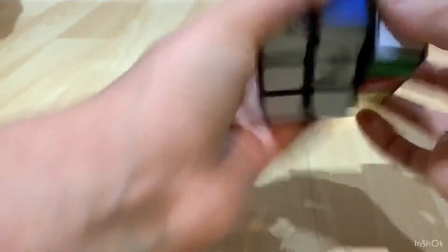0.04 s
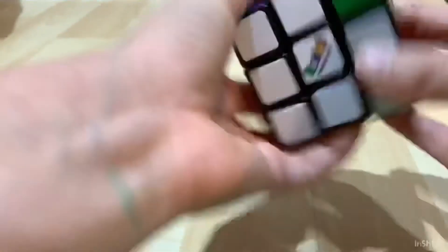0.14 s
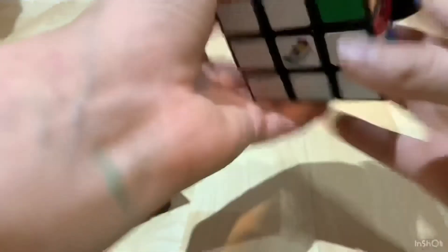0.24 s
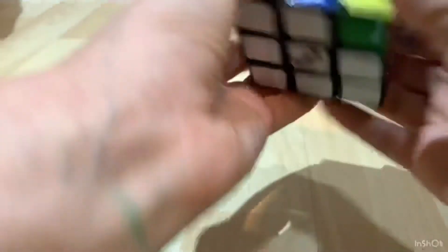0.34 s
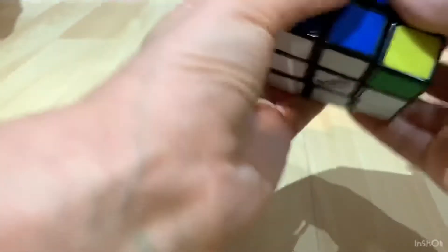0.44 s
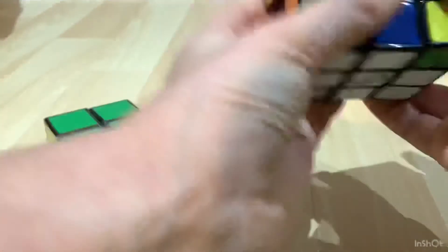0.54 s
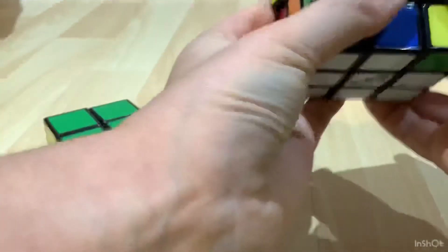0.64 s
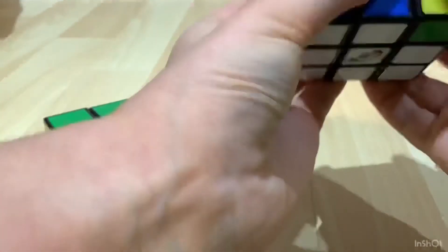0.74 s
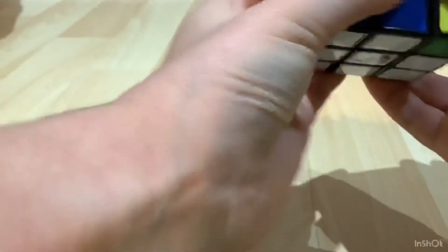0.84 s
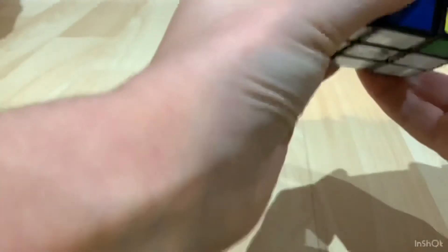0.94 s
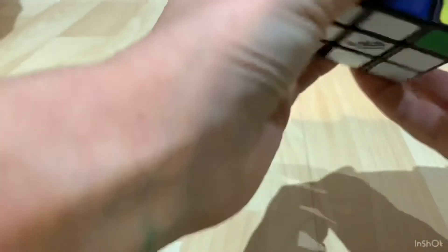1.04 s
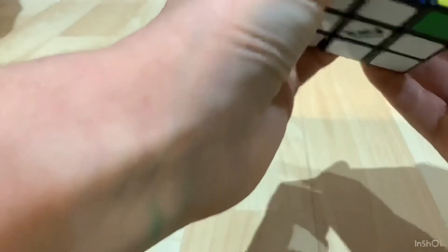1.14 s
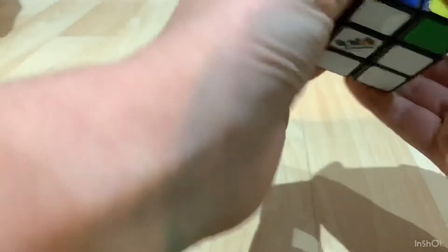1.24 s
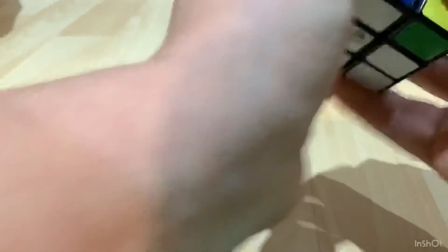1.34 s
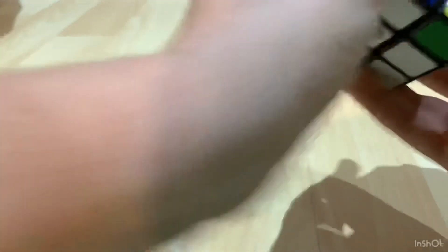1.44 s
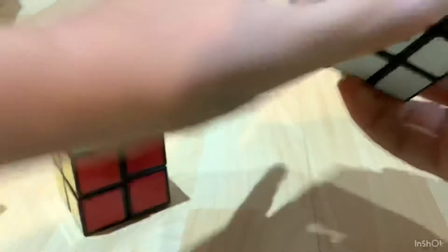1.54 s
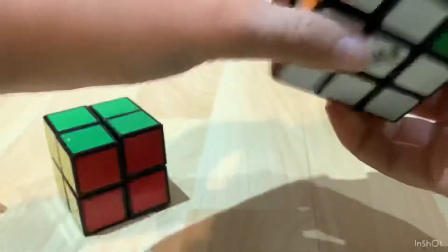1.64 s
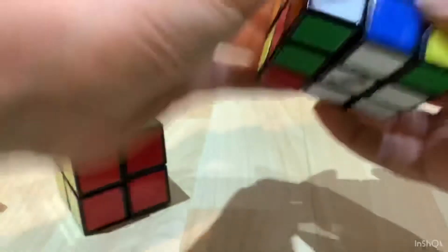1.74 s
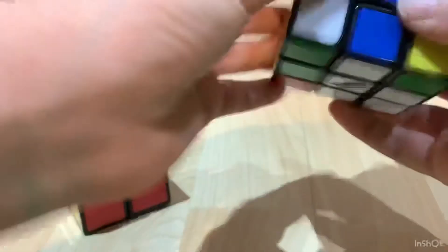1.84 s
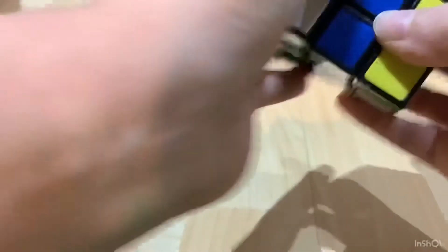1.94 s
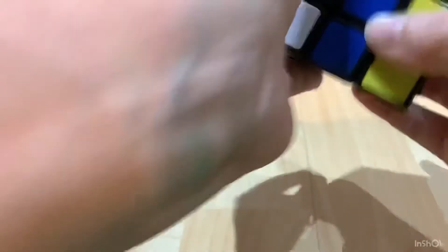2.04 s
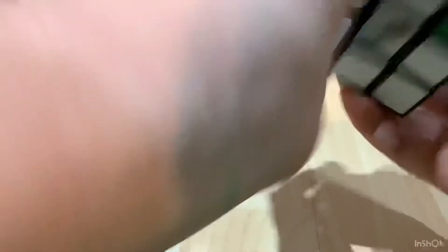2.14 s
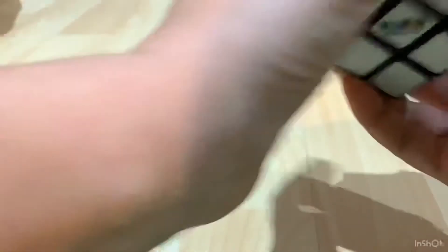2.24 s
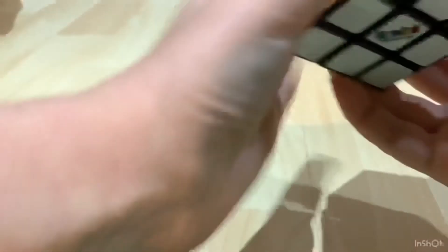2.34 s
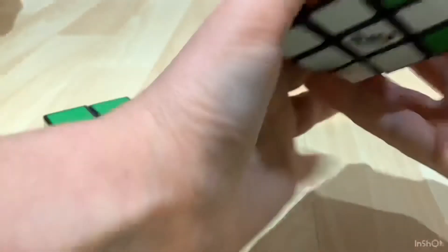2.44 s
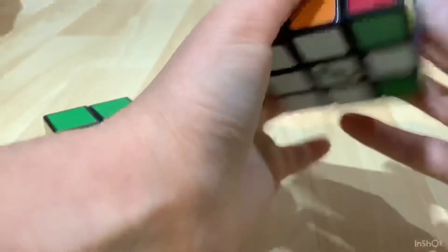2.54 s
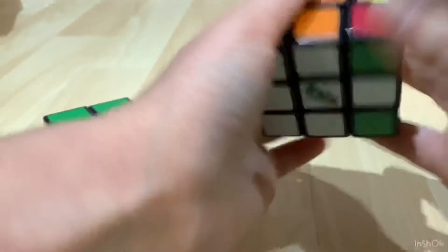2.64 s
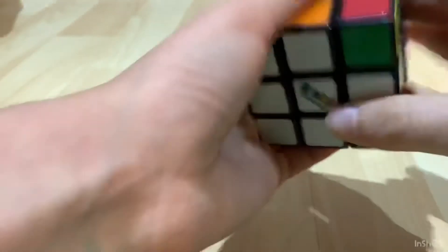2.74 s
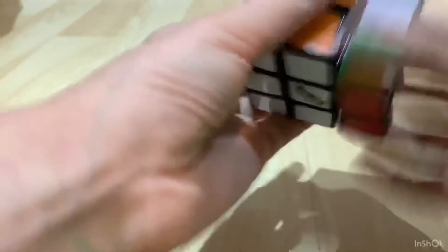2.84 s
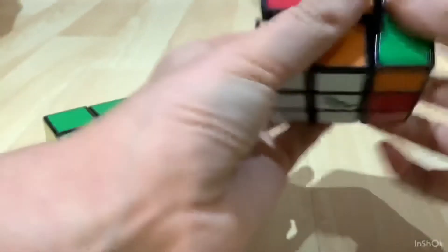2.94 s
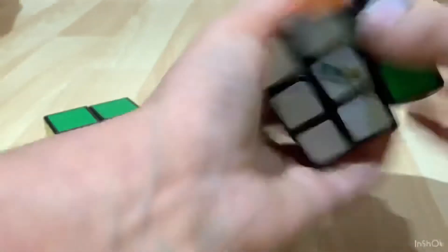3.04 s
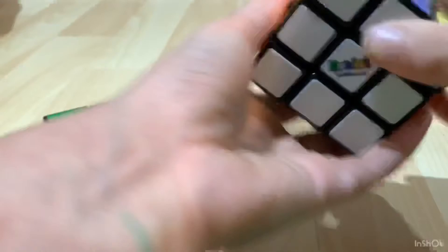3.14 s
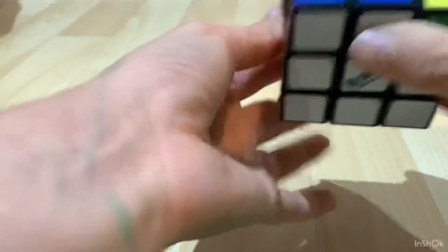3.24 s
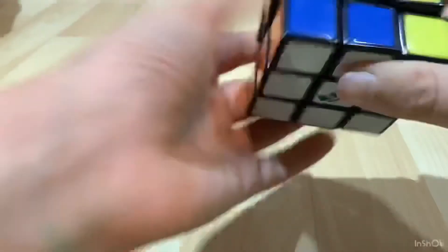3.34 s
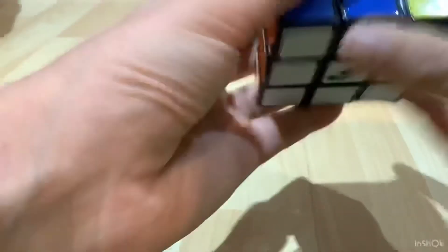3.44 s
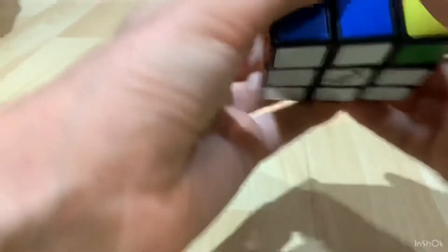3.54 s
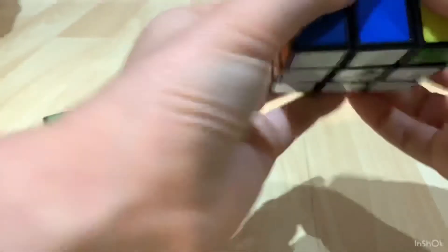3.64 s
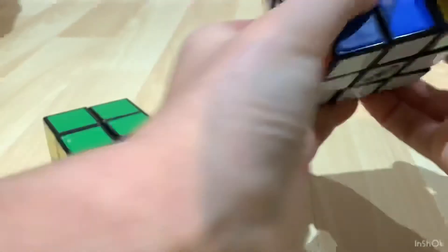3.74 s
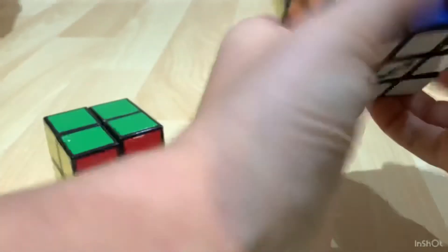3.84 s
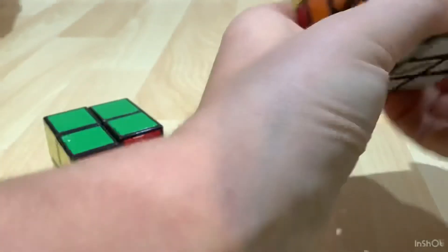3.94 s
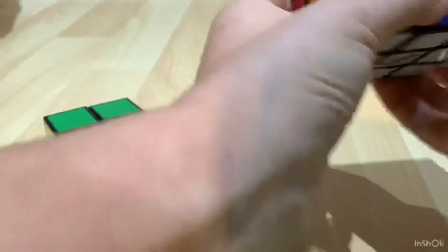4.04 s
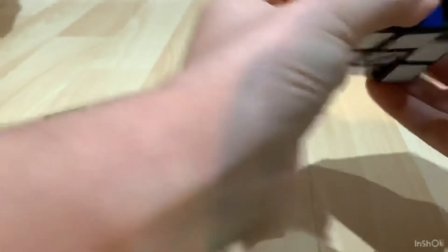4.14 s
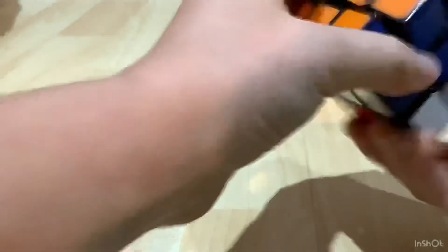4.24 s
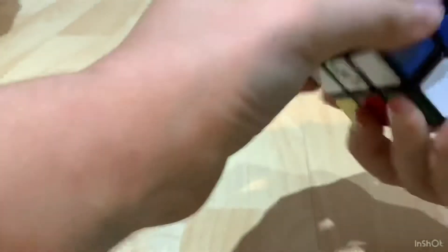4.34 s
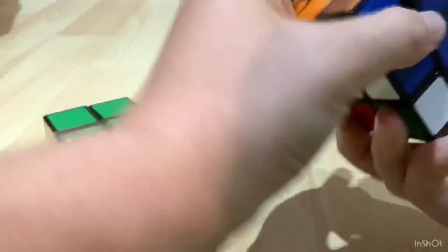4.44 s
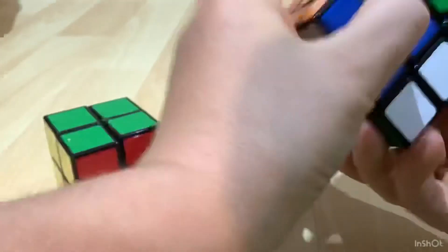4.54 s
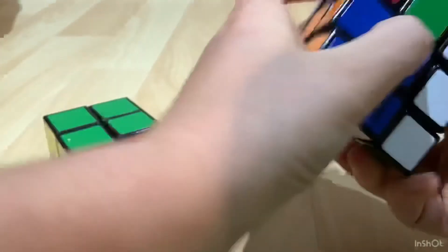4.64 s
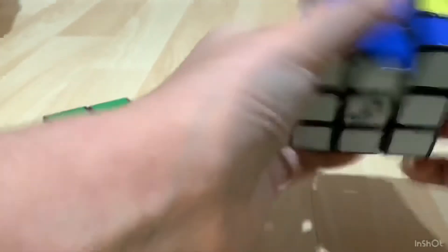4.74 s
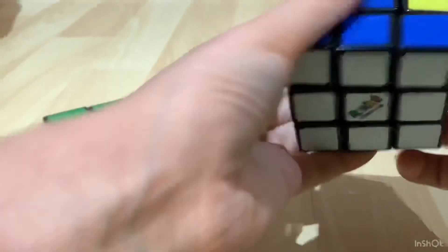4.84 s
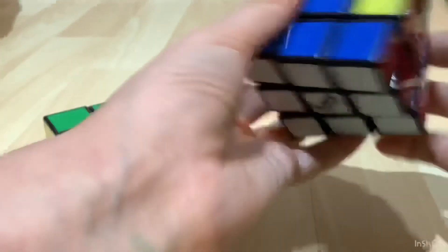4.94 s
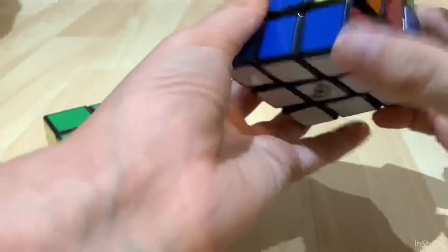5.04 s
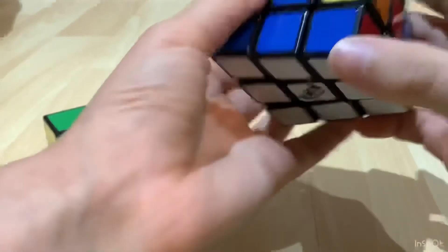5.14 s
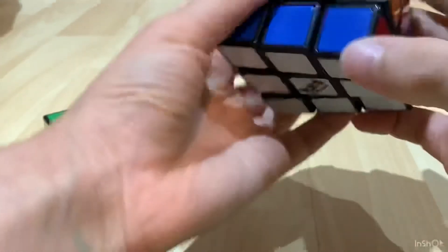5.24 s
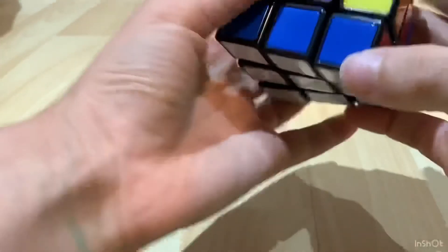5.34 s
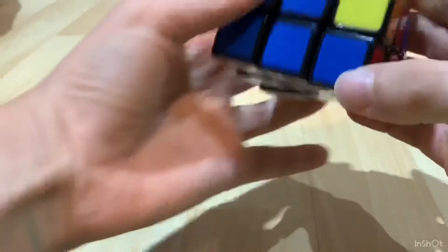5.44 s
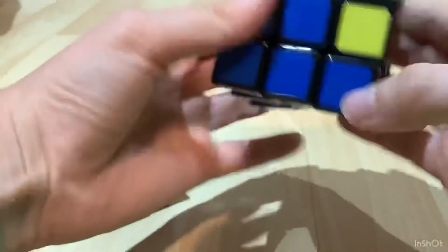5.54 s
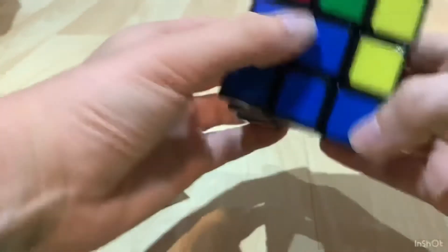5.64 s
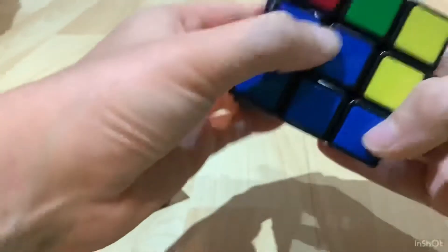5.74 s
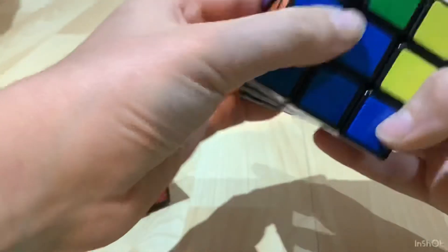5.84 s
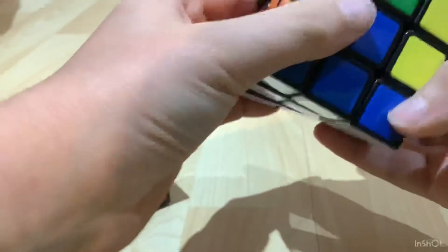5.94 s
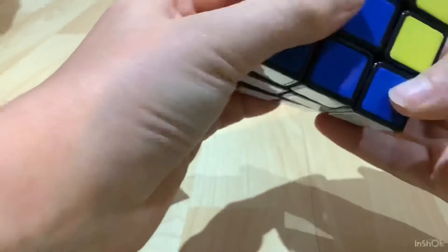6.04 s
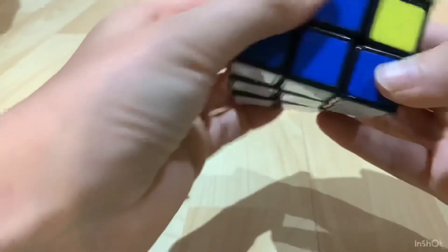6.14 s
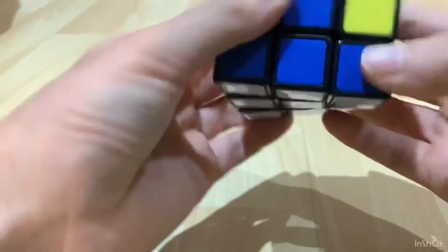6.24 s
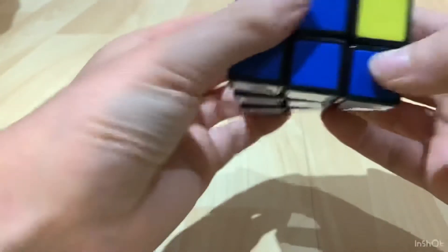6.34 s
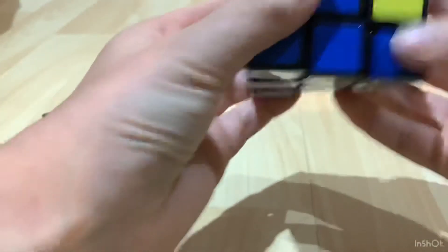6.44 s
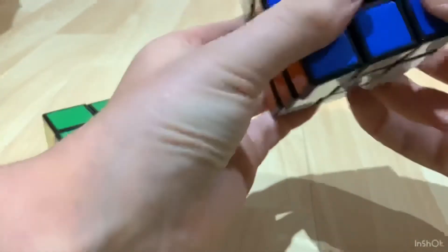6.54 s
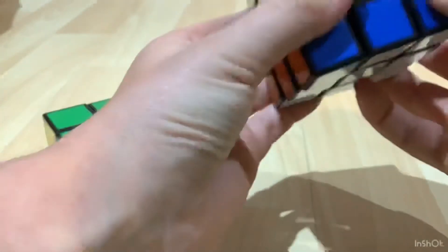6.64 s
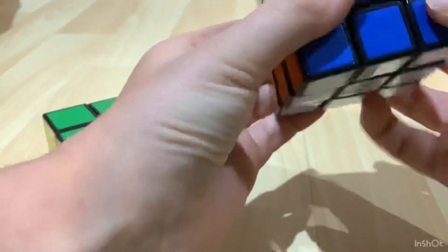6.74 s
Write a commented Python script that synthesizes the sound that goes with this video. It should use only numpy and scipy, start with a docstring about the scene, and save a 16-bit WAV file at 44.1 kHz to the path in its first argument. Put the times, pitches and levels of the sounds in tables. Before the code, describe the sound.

A plastic puzzle cube is turned fast by hand, very close to the microphone in a quiet small room. Bright hollow clacks come in irregular clusters with short gritty scrapes of sliding faces, tiny loose ticks and a light hiss of fingers. Turns grow denser and louder through the middle, then fade to faint handling ticks before a last hard burst of clacks. Soft air noise and low hum lie beneath.

```python
"""Rapid plastic clacks open the scene over quiet air and low hum: a puzzle cube twisted by hand in a quiet room.
Each clack is a short chatter of impacts ringing the shell's modes; weaker ticks of loose pieces fall among them.
Faces grind past each other as clumped slips that ring the same shell, swelling with every move.
Fingers hiss over the glossy tiles and scuff in narrower bands, both made from random tiny impacts.
The room adds a diffuse noise echo, and the loudest peaks are softly rounded."""
import sys
import numpy as np
from scipy import signal
from scipy.fft import rfft, irfft, next_fast_len
from scipy.io import wavfile
from scipy.ndimage import uniform_filter1d

SR = 44100
rng = np.random.default_rng(int(sys.argv[2]) if len(sys.argv) > 2 else 0)


def store_wav(level_fs):
    """Save 16-bit WAV to argv[1]."""
    pcm = np.round(np.clip(np.atleast_2d(level_fs), -1, 1) * 32767)
    wavfile.write(sys.argv[1], SR, pcm.T.astype(np.int16))


N = 299439

# resonances of the cube's shell, before the loss of bass: pitch_hz, width_hz, level_db (relative)
SHELL_MODES = [(208, 146, 12.5), (741, 383, 7), (1307, 548, 11), (2070, 370, 5), (3020, 290, 10),
               (3505, 340, 8.5), (4597, 830, 3.5), (5130, 550, 6.5), (5880, 1400, 2), (8890, 1830, 0.5),
               (9824, 1400, 2.5), (11400, 6500, -12)]


def amp(db):
    """Decibels to gain."""
    return 10 ** (np.asarray(db) / 20)


def evened(x):
    """Scales to rms 1."""
    return x / np.sqrt(np.mean(x ** 2) + 1e-20)


def read(points, hz):
    """Reads a curve of (frequency, value) points on a log-frequency axis."""
    f, value = np.transpose(points)
    return np.interp(np.log(hz + 1), np.log(f + 1), value)


def coloured(x, gain_of_hz):
    """Multiplies the spectrum of x by a response."""
    size = next_fast_len(len(x))
    hz = np.fft.rfftfreq(size, 1 / SR)
    return irfft(rfft(x, size) * gain_of_hz(hz), size)[:len(x)]


def room_tone():
    """Steady air noise and a few narrow, wavering bands of hum, all filtered from white noise."""
    # colour of the air noise: pitch_hz, level_db (relative)
    air_colour = [(30, -46), (45, -9), (110, -9.5), (400, -23.5), (700, -19.5), (1400, -42), (5000, -35.5),
                  (9000, -33), (11500, -41.5), (16000, -43)]
    # hum bands: pitch_hz, width_hz (between half-amplitude points), level_db (rms)
    hum_bands = [(66, 8.6, -65.5), (88.6, 3, -57.5), (236.4, 35, -66.5), (294.2, 30, -70)]
    air_db = -59
    out = amp(air_db) * evened(coloured(rng.standard_normal(N), lambda hz: amp(read(air_colour, hz))))
    for f, width_hz, db in hum_bands:
        band = coloured(rng.standard_normal(N), lambda hz: 1 / (1 + (2 * (hz - f) / width_hz) ** 2))
        out += amp(db) * evened(band)
    return out


def modes(hz):
    """Response of each shell mode, one row a mode; so small an object radiates little bass."""
    radiated = 1 / (1 + (600 / (hz + 1)) ** 4)
    rows = []
    for k, (f, width_hz, db) in enumerate(SHELL_MODES):
        # signs go in pairs for the first four modes, then alternate
        sign = (-1) ** (max(k, 1) + (k > 2))
        damping = 1j * hz * width_hz
        rows.append(sign * amp(db) * radiated * damping / (f ** 2 - hz ** 2 + damping))
    return np.array(rows)


def grit(per_s=8000, spread_db=2.4):
    """Tiny random impacts, most of them small, a few large."""
    size = amp(spread_db * np.minimum(rng.exponential(1, N), 5))
    sign = rng.choice([-1., 1.], N)
    return size * sign * (rng.random(N) < per_s / SR)


def clumps(depth_db, size):
    """Uneven contact: a gain that flickers by chance over size samples, its highest leaps capped."""
    flicker = evened(uniform_filter1d(rng.standard_normal(N), size=size))
    return amp(depth_db * np.minimum(flicker, 2))


def motion(column):
    """Gain curve of one column of the moves: swells fall evenly in dB from each peak and add up."""
    # turns and regrips: peak_s, grinding_db, fingers_db, lead_in_s, run_out_s
    moves = np.array([(0, -31.5, -35.5, .05, 0.097), (.15, -42, -49, 0.15, 0.27),
                      (0.464, -30, -54, 0.06, 0.043), (.56, -55, -53, 0.15, 0.21),
                      (0.902, -61, -44, 0.022, 0.075), (1.12, -65, -62, 0.3, 0.021),
                      (1.253, -39.5, -55, 0.091, 0.087), (1.654, -29.5, -35.5, 0.06, 0.043),
                      (1.806, -33.5, -60, 0.062, 0.063), (2.069, -29.5, -43, 0.037, 0.092),
                      (2.253, -50, -50, 1, 0.31), (2.462, -55.5, -47, 0.11, 0.21),
                      (2.791, -29, -32, 0.064, 0.014), (2.973, -33.5, -40, 0.15, 0.24),
                      (3.163, -29.5, -34.5, 0.052, 0.023), (3.314, -52.5, -39.5, 0.052, 0.11),
                      (3.562, -47, -50, 0.16, 0.072), (3.624, -18.5, -28.5, 0.016, 0.031),
                      (3.839, -53.5, -100, 0.56, 0.2), (3.947, -26.5, -41, 0.028, 0.066),
                      (4.151, -31, -33.5, 0.088, 0.057), (4.33, -43, -54.5, 0.3, 0.3),
                      (4.655, -23.5, -28.5, 0.015, 0.048), (5.05, -58, -57, 1, 0.5),
                      (5.298, -53, -55.5, 0.064, 0.062), (5.508, -64, -45.5, 0.051, 0.16),
                      (6.002, -62, -57, 0.084, 1), (6.182, -47.5, -45.5, 0.041, 0.046),
                      (6.437, -34.5, -38, 0.07, 0.037), (6.55, -50.5, -89, 0.068, 0.2),
                      (6.742, -45, -83, 0.017, 0.02)])
    drop_db = 23  # fall at one lead-in before the peak or one run-out after it
    t = np.arange(0, N + 64, 64) / SR
    late = t - moves[:, :1]
    side_s = np.where(late < 0, moves[:, 3:4], moves[:, 4:5])
    far = abs(late) / np.maximum(side_s, 1e-3)
    gain = amp(moves[:, column, None] - drop_db * far).sum(0)
    return np.interp(np.arange(N) / SR, t, gain)


def grinding():
    """Faces scrape in clumped slips shared among contact points, each ringing the shell in its own colour."""
    slips = clumps(3.8, size=120) * grit(per_s=2000, spread_db=2.4)
    points = 4
    # one contact point at a time slips, drawn anew every 256 samples
    point = rng.integers(points, size=N // 256 + 1).repeat(256)[:N]
    shares = amp(3.0 * rng.standard_normal((points, len(SHELL_MODES))))
    scrape = np.zeros(N)
    for k, share in enumerate(shares):
        scrape += coloured(slips * (point == k), lambda hz: share @ modes(hz) * (1 + hz / 3000) ** -.4)
    return motion(column=1) * evened(scrape)


def fingers():
    """Skin on glossy tiles: a grainy hiss that sticks and slips."""
    # colour of skin on tiles: pitch_hz, level_db (relative)
    skin_colour = [(1500, -8), (8500, -1), (12000, -12), (16000, -32)]
    fizz = clumps(4.2, size=250) * grit()
    return motion(column=2) * evened(coloured(fizz, lambda hz: amp(read(skin_colour, hz))))


def loose_ticks():
    """Clack rows for loose pieces ticking at chance moments, their level following the grinding."""
    ticks_per_s = 24
    over_grinding_db, top_db, spread_db = 9, -34, 1.5  # the spread comes after the cap at top_db
    bright_spread_db, typical_ms = 9.5, 2.7  # brightness is per octave
    count = round(ticks_per_s * N / SR)
    # one tick at a random moment in each equal slot
    s = (np.arange(count) + rng.random(count)) / ticks_per_s * (1 - 1 / count)
    a, b, c = rng.standard_normal((count, 3)).T
    moving_db = 20 * np.log10(motion(column=1)[(s * SR).astype(int)])
    blow_db = np.minimum(moving_db + over_grinding_db, top_db) + spread_db * a
    return np.transpose([s, blow_db, bright_spread_db * b, typical_ms * np.exp(c / 2)])


def clacks():
    """Layers catch and seat: each chatter of impacts rings every shell mode by its own chance amount."""
    # clear clacks: time_s, blow_db, brightness_db_per_octave, chatter_ms (held to 0.5-7 ms below)
    clear_clacks = [(.0099, -21.5, 1, 11), (.0263, -27.5, 1, 10), (.0401, -22, 3.5, 2.9),
                    (.049, -29, 1, 2.3), (.1137, -27, 2, 2), (.121, -21.5, -1.5, 3.5),
                    (.1437, -25.5, -0.5, 10), (.1526, -25.5, 3, 2.3), (.1601, -29, -1.5, 5.8),
                    (.3154, -37.5, 3, 3.3), (.3434, -29.5, 2, 1.7), (.4055, -31, -1.5, 2),
                    (.4115, -20.5, -1.5, 2.2), (.429, -32, -0.5, 2.3), (.4437, -25, -7, 1.3),
                    (.4475, -25.5, 2, 2.2), (.4527, -17.5, -2.5, 0.91), (.4592, -32, 0, 2.3),
                    (.4718, -30, 0, 3.4), (.4878, -34, -2.5, 2.4), (.5732, -42, -2.5, 3.8),
                    (.6203, -38.5, -1.5, 3), (.8545, -47, 3.5, 4.5), (.873, -47, 0, 2.5),
                    (.8916, -36.5, 16, 2.7), (1.056, -44, 2.5, 3), (1.068, -47, 1, 2.9),
                    (1.1978, -43, 15, 4), (1.2375, -29.5, -8, 2.6), (1.2481, -24.5, -0.5, 3.3),
                    (1.2643, -21.5, -1, 1.7), (1.2943, -35, -3, 5.3), (1.3051, -34, -1, 3.2),
                    (1.3249, -25, -0.5, 12), (1.392, -28.5, -1.5, 1.7), (1.412, -41, 6, 1.2),
                    (1.5302, -35.5, 5, 3.3), (1.5546, -32, 4, 1.1), (1.5739, -34, 1, 2.1),
                    (1.6037, -24.5, -1, 4.6), (1.644, -21, 4.5, 2.1), (1.6499, -14, 2.5, 0.93),
                    (1.6546, -24, 1, 0.63), (1.6594, -24.5, -2, 4.6), (1.671, -26.5, -0.5, 5.7),
                    (1.751, -34.5, 3.5, 6), (1.775, -25.5, 0.5, 1.55), (1.7964, -17, 0, 1.7),
                    (1.8092, -26, 11, 2.9), (1.8255, -33, -2.5, 6.2), (1.854, -30.5, -3, 3.4),
                    (1.865, -32, -0.5, 9.4), (1.8827, -28.5, -4.5, 1.3), (2.0007, -26.5, 2.5, 2.1),
                    (2.0325, -25, -1, 12), (2.0505, -31, 4, 3.6), (2.0655, -20.5, -3, 5.7),
                    (2.0761, -19, 3.5, 2.8), (2.1055, -38, 7, 2.6), (2.152, -31, -2, 1.4),
                    (2.1824, -28.5, -1, 11), (2.1988, -28, 1.5, 9.1), (2.2293, -34.5, -5, 7.2),
                    (2.2436, -19, -0.5, 2.7), (2.26, -28.5, -1, 5.9), (2.3288, -31, -1.5, 8.7),
                    (2.351, -34, -6.5, 1.8), (2.358, -26.5, -2, 1.1), (2.6054, -33, 1, 2.6),
                    (2.6901, -35.5, 10, 1.3), (2.7004, -38.5, 2, 1.8), (2.7346, -18, 0.5, 2.2),
                    (2.7503, -33.5, -2.5, 12), (2.7597, -21, 1.5, 5.1), (2.7721, -13.5, -0.5, 2.7),
                    (2.7804, -20.5, 7, 2.3), (2.7925, -21, 0, 2.5), (2.7985, -18.5, 3.5, 2.8),
                    (2.8022, -12.5, -1, 3.5), (2.8892, -19, -1.5, 3), (2.8985, -19, 1.5, 2.5),
                    (2.9215, -27, 1, 1.7), (2.9464, -30, 1.5, 2.3), (2.9612, -14.5, 1, 3.3),
                    (2.9672, -4, 3, 1.8), (2.9943, -24, 5, 1.6), (3.0135, -16.5, 1, 4.7),
                    (3.0892, -29, -1.5, 1.6), (3.108, -27.5, -7, 1.6), (3.125, -21.5, 0, 1.7),
                    (3.1326, -25, 3, 2), (3.149, -21, 0, 2.3), (3.1549, -15.5, 1, 1.3),
                    (3.1621, -21, -1.5, 1.1), (3.1725, -26.5, -1, 6.5), (3.1782, -24.5, 2.5, 2.4),
                    (3.2617, -40.5, 6, 3.8), (3.3045, -34.5, 5, 4.5), (3.3957, -38.5, 2.5, 10),
                    (3.5068, -32, 6.5, 2.9), (3.53, -36.5, -2, 1.8), (3.5533, -19.5, -12, 1.1),
                    (3.5713, -23.5, 1, 1.1), (3.5755, -23.5, -3, 1.6), (3.6052, -24.5, -0.5, 4.3),
                    (3.6125, -23.5, -3, 2.5), (3.6199, -10.5, 3.5, 2.5), (3.6298, -16, 2.5, 3),
                    (3.6472, -25, 0.5, 6.2), (3.655, -15.5, -1.5, 1.46), (3.7492, -35.5, 1.5, 5.7),
                    (3.785, -31, 9, 0.89), (3.7917, -35.5, -2.5, 4.2), (3.8495, -32, 27.5, 1.5),
                    (3.8955, -33.5, 4.5, 1), (3.9023, -29.5, -3.5, 1.4), (3.928, -21.5, 1.5, 1.9),
                    (3.9355, -22.5, -16.5, 1.7), (3.95, -11.5, 0.5, 2.5), (3.974, -28, 0, 10),
                    (3.979, -13.5, 2, 4.1), (4.0701, -40.5, 1.5, 2), (4.083, -38, 7, 1.6),
                    (4.1073, -39, 5, 1.5), (4.1112, -23, 3, 1.2), (4.118, -23.5, -1, 3.3),
                    (4.13, -12, 1, 2.6), (4.1415, -34, -4, 3.6), (4.1538, -21, 0.5, 2.9),
                    (4.159, -19, -2, 3), (4.1654, -17, 1, 1.1), (4.2026, -30.5, 0, 5),
                    (4.2203, -33.5, -1.5, 5.9), (4.2634, -38, 0, 4.8), (4.2737, -30, 0, 2),
                    (4.2861, -31.5, 0, 6.5), (4.374, -43, 9, 5.8), (4.4143, -32.5, -3.5, 1.2),
                    (4.491, -35.5, -0.9, 3.9), (4.5154, -37.5, -1.5, 1.4), (4.5548, -40, -1, 3.3),
                    (4.583, -18, -1.5, 2), (4.607, -14, 3, 0.93), (4.6254, -30, -1, 2.2),
                    (4.6535, -13.5, 0.5, 3.5), (4.6721, -16, -1, 3.5), (4.7712, -38, 9, 2),
                    (4.78, -33.5, -0.5, 15), (4.8018, -34, 1, 6.6), (4.8216, -26.5, -1, 2.9),
                    (4.871, -38, 7.5, 7.3), (4.8857, -23.5, -1.5, 4.3), (4.9732, -41, 3.5, 3.8),
                    (5.0198, -30.5, 13, 0.79), (5.057, -44.5, 4.5, 22), (5.11, -39.5, 1, 2.9),
                    (5.1534, -33.5, 1.5, 1.2), (5.18, -40, 1, 1.3), (5.187, -46.5, 3, 1.5),
                    (5.209, -43, 0, 3.1), (5.2938, -40, 4.5, 11), (5.5004, -37.5, 11, 3.1),
                    (5.5515, -46, 0.5, 2.5), (5.6056, -48, 1, 4.2), (5.6368, -37.5, 1, 1),
                    (5.692, -47, 1, 7.1), (5.7974, -47, -1.5, 1.6), (5.9235, -39.5, 1.4, 11),
                    (5.9555, -47, 0, 4.8), (5.9904, -45, 10, 4.1), (6.131, -34.5, 4.5, 1.1),
                    (6.1755, -40, 6, 1.5), (6.2846, -44.5, -0.5, 4.7), (6.3607, -34.5, -1, 3.1),
                    (6.3925, -14, 1, 1.3), (6.4225, -12.5, 1, 1.6), (6.4258, -15.5, 1.5, 2.9),
                    (6.4348, -5.5, 2.5, 1.6), (6.4408, -11.5, 3.5, 4.4), (6.5639, -29.5, 16, 0.68),
                    (6.6003, -39, -1.5, 4.7), (6.6185, -37.5, 1, 2.5), (6.7344, -33, -1, 2.1),
                    (6.7488, -15.5, -1.5, 2.26)]
    lead = 0.23  # full contact comes this many chatter lengths before time_s
    rise_low, rise_high, split_hz = 2.76, 2.85, 9000  # rise per chatter length: lows build slightly slower
    size = 1024
    s, blow_db, bright_db, length_ms = np.vstack([clear_clacks, loose_ticks()]).T[:, :, None]
    length_ms = np.clip(length_ms, .5, 7)
    draws = rng.standard_normal((len(s), size + len(SHELL_MODES) + 1))
    noise, mode_luck, grips = draws[:, :size], draws[:, size:-1], draws[:, -1]

    # time from full contact, in chatter lengths
    u = (np.arange(size) - size // 2) / SR * 1000 / length_ms + lead
    rattle = noise * abs(noise) ** 0.32 * np.exp(-1.3 * np.maximum(u, 0) ** 0.85)
    low = rfft(rattle * np.exp(rise_low * np.minimum(u, 0)), 2 * size)
    high = rfft(rattle * np.exp(rise_high * np.minimum(u, 0)), 2 * size)
    hz = np.fft.rfftfreq(2 * size, 1 / SR)
    chatter = high + (low - high) / (1 + (hz / split_hz) ** 2)

    octaves = np.log2(np.array(SHELL_MODES)[:, 0] / 3000)
    shares = amp(bright_db * octaves + 2.0 * mode_luck)
    # the grip shifts the modes a little from clack to clack
    ring = np.array([share @ modes(hz * (1 + 0.033 * grip)) for share, grip in zip(shares, grips)])
    sound = irfft(chatter * ring)
    # equal blows of longer chatter carry more energy
    sound *= amp(blow_db) * np.sqrt(length_ms / 1000 * SR) / np.linalg.norm(sound, axis=1, keepdims=True)
    out = np.zeros(N + 2 * size)
    for start, row in zip(np.round(s[:, 0] * SR).astype(int), sound):
        out[start:start + 2 * size] += row
    return out[size // 2:][:N]


def room(x):
    """Diffuse echo: the power in each band lingers as noise and dies at its own speed."""
    # echo decay: pitch_hz, t60_s
    decay = [(400, 0.29), (2000, 0.28), (12000, 0.42)]
    hz, t, z = signal.stft(x, SR, nperseg=256, noverlap=192)
    power = uniform_filter1d(abs(z) ** 2, size=3, axis=0)  # many paths blur the colour of a single clack
    keep = amp(-120 * t[1] / read(decay, hz))  # power kept per frame
    # the echo starts four frames late
    held = np.array([signal.lfilter([0, 0, 0, 0, 1 - r], [1, -r], row) for r, row in zip(keep, power)])
    a, b = rng.standard_normal(held.shape[::-1] + (2,)).T
    echo = np.sqrt(2 * held) * (a + 1j * b)
    return signal.istft(echo, SR, nperseg=256, noverlap=192)[1][:N]


def scuffs():
    """The hand slides: each band is a swell of rubbing noise in one resonance."""
    # rubbing bands: peak_s, half_length_ms (to 1/e), pitch_hz, level_db (at the peak), sharpness (no unit)
    rubbing_bands = [(2.38, 90, 11600, -46.5, 3.7), (2.45, 40, 9000, -43.5, 9), (2.442, 18, 2050, -43, 21),
                     (2.45, 25, 3600, -44, 59), (2.452, 30, 4900, -44, 9.3), (2.474, 30, 710, -44.5, 1.8),
                     (5.32, 32, 630, -50, 3), (0.934, 39, 8300, -52, 7.6)]
    t = np.arange(N) / SR
    rub = evened(clumps(1.5, size=120)) * grit()
    out = np.zeros(N)
    for s, half_ms, f, db, sharp in rubbing_bands:
        swell = np.exp(-(1000 * (t - s) / half_ms) ** 2)
        band = coloured(rub, lambda hz: 1 / (1 + (sharp * np.log(hz / f + 1e-9)) ** 2))
        out += amp(db) * swell * evened(band)
    return out


def scene():
    """The cube close by, its echo in the room, and the room tone."""
    cube = clacks() + grinding() + fingers() + scuffs()
    return (cube + amp(-16.0) * room(cube) + room_tone())[None]


def record(dry):
    """Rounds off the loudest peaks softly, then cuts the extreme treble."""
    ceiling, edge_hz = 1.05, 15800
    rounded = ceiling * np.tanh(dry / ceiling)
    lowpass = signal.firwin(255, edge_hz, window=("kaiser", 8), fs=SR)
    return signal.oaconvolve(rounded, lowpass[None], "same")


dry = scene()
out = record(dry)
store_wav(out)
```